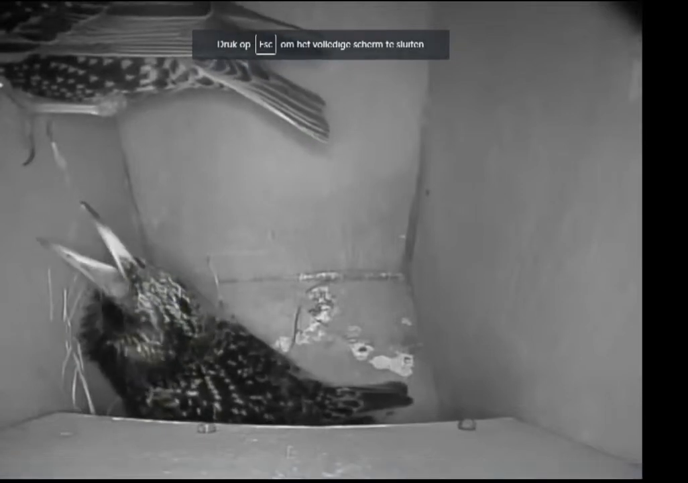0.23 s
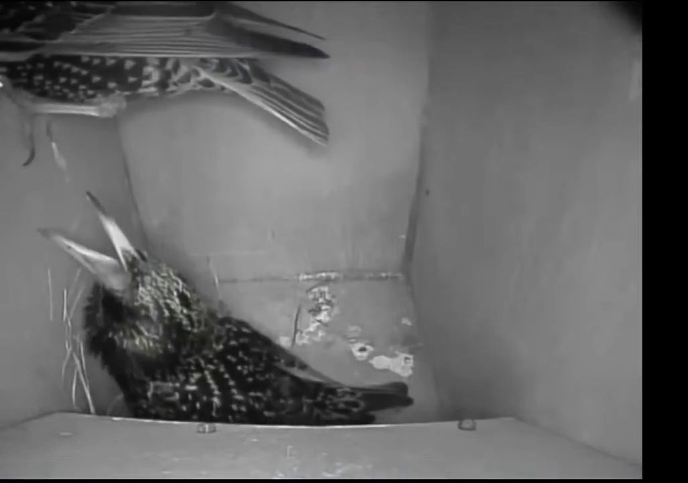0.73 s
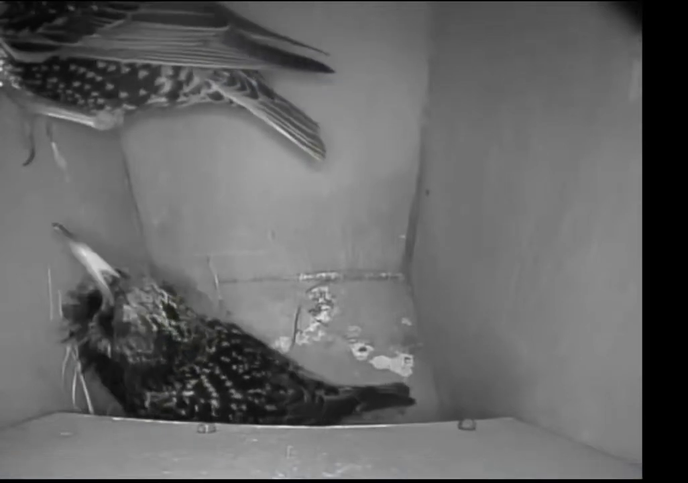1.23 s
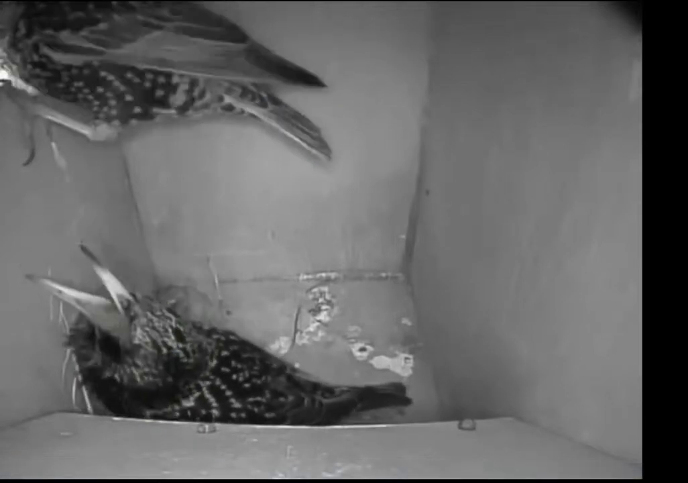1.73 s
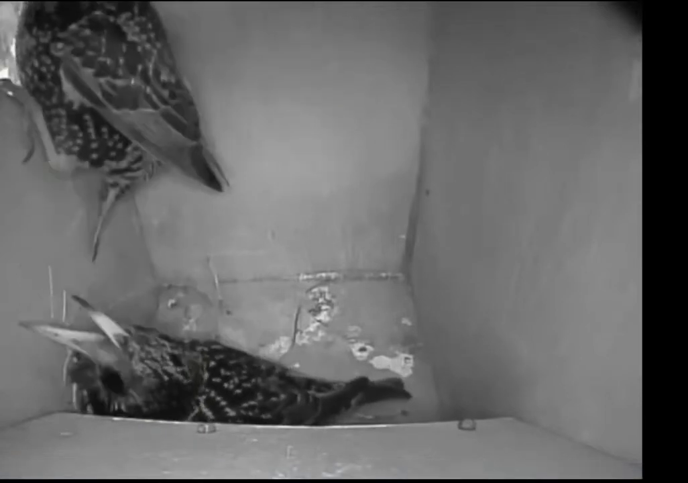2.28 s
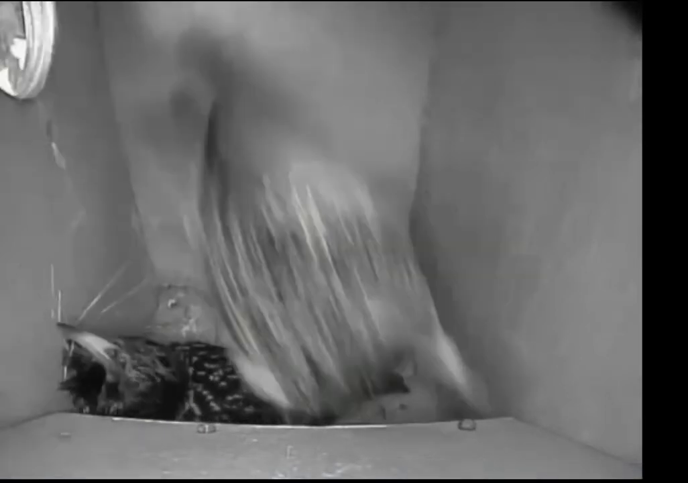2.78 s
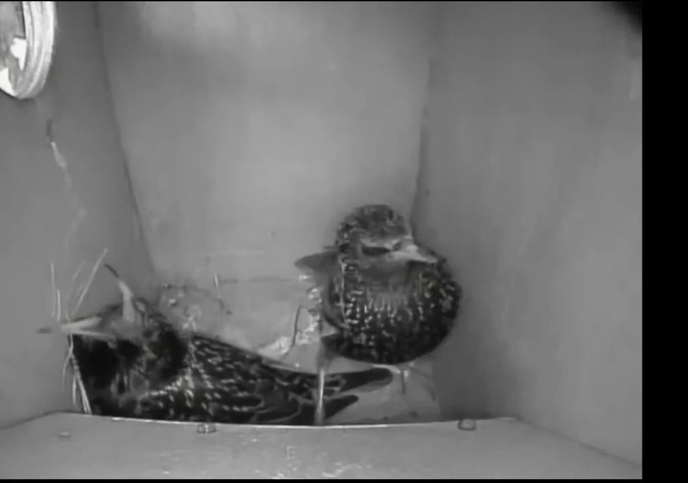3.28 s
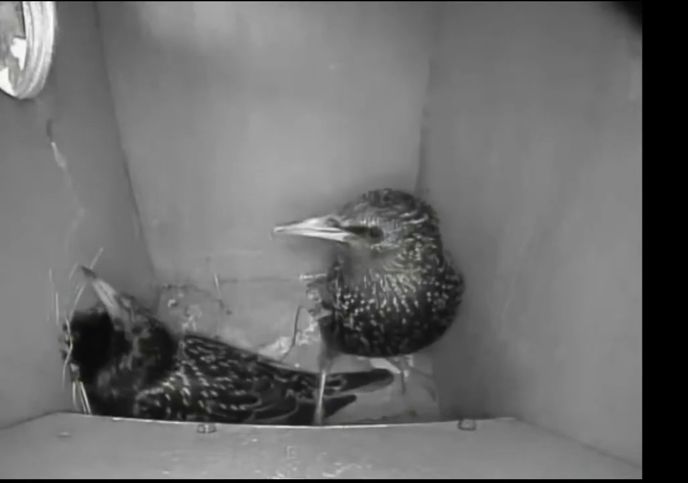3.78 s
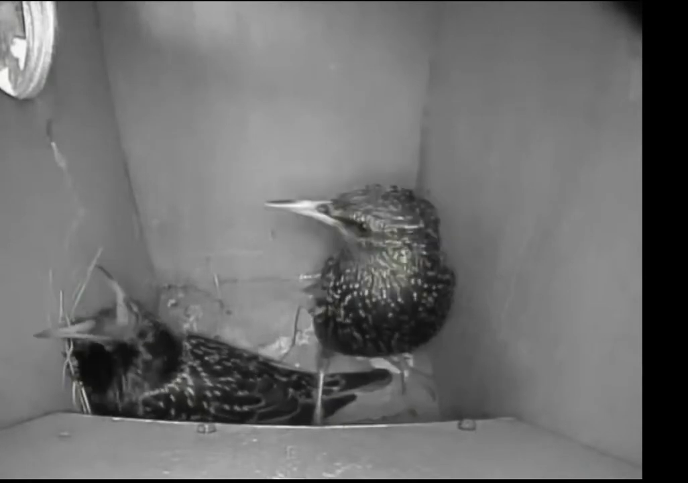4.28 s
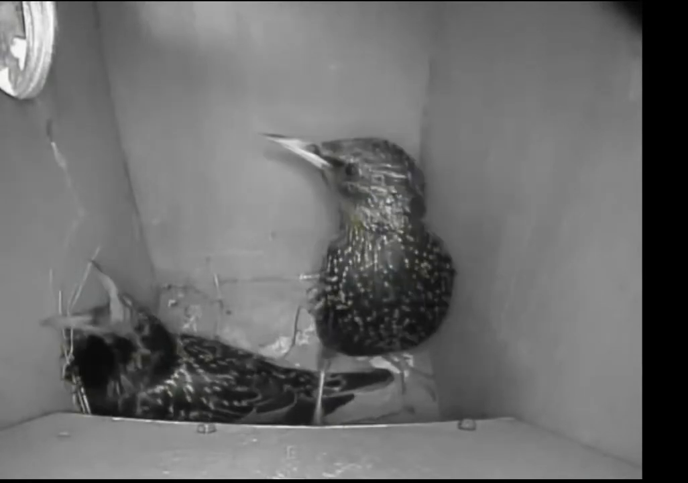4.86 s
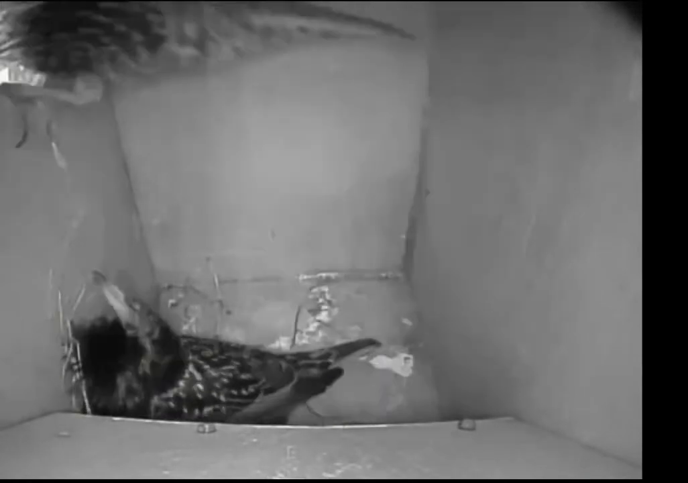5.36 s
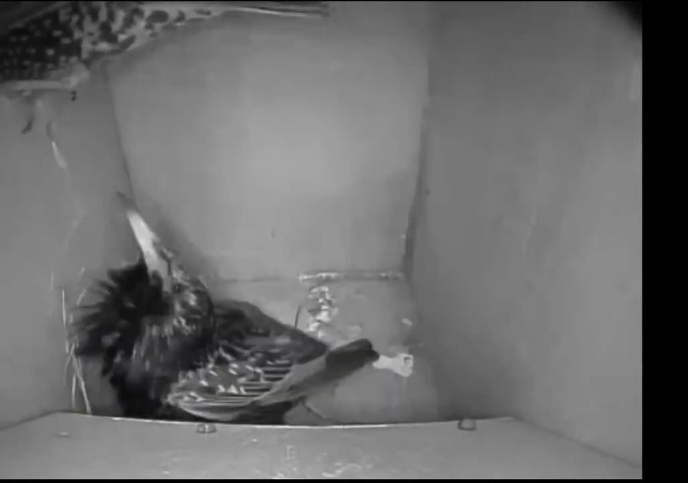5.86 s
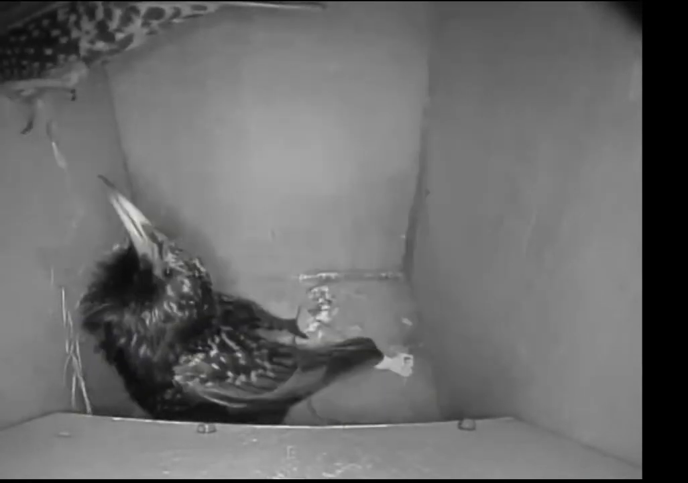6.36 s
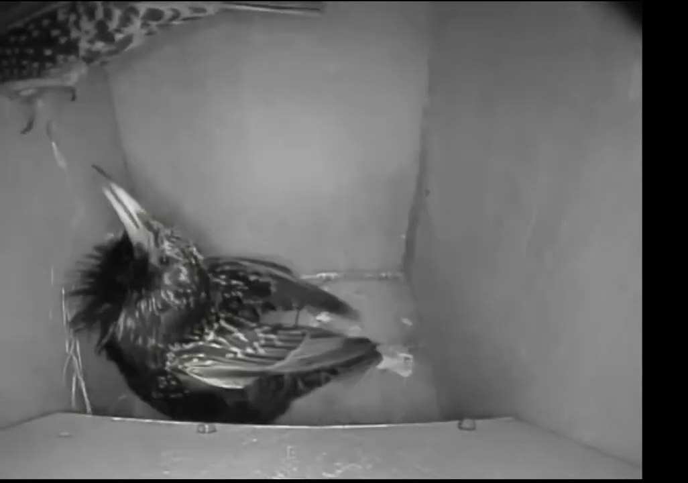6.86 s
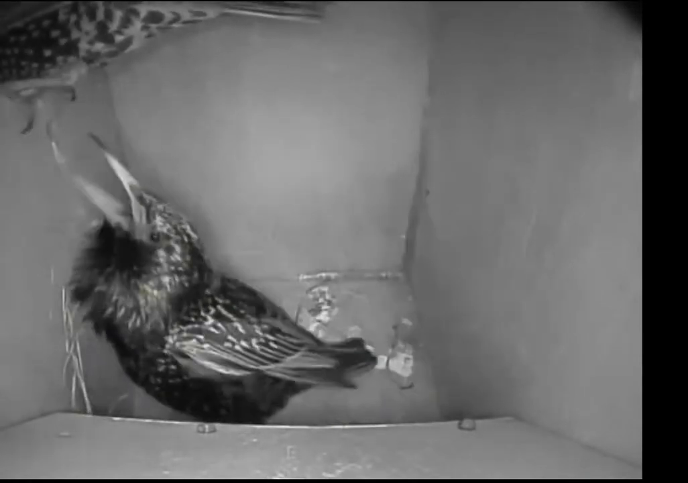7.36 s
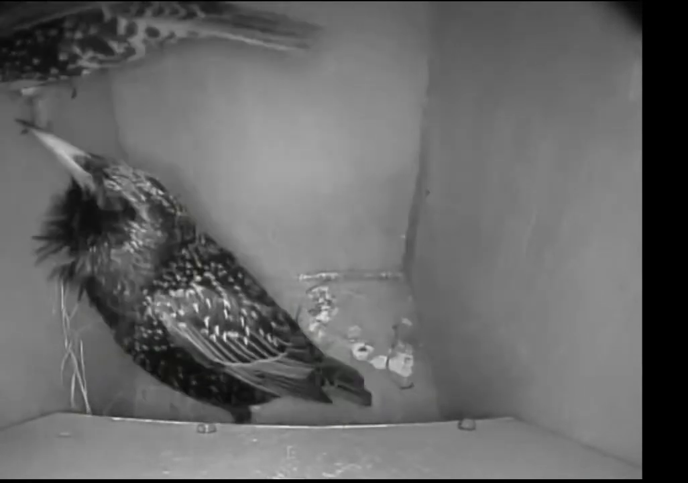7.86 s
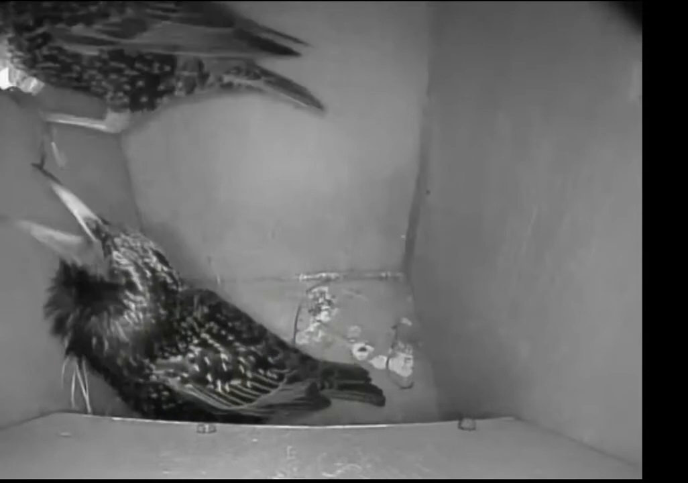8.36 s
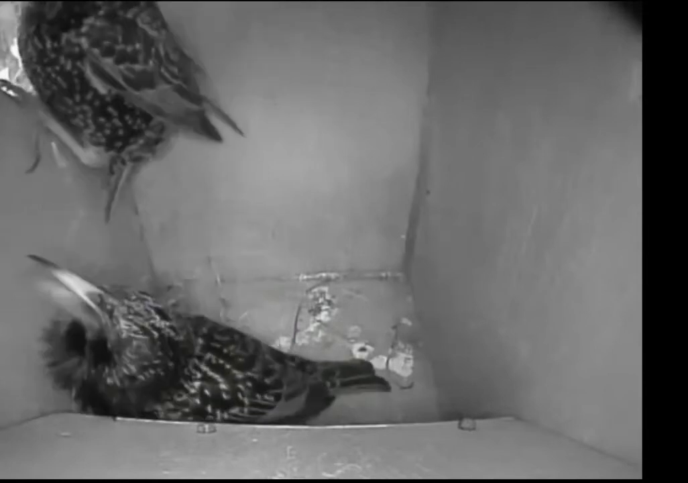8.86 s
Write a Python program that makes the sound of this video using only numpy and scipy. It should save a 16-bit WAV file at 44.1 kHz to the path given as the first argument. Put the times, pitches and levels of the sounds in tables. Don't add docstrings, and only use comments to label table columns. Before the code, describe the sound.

Inside a small wooden nest box, a starling whistles softly, then clicks, screeches and bursts into fast, shrill rattles over low microphone rumble.

```python
import sys
import numpy as np
from scipy import signal
from scipy.fft import rfft, irfft, next_fast_len
from scipy.io import wavfile
from scipy.ndimage import uniform_filter1d

SR = 44100
rng = np.random.default_rng(int(sys.argv[2]) if len(sys.argv) > 2 else 0)


def volts_from_db(level):
    exponent = np.asarray(level, float) / 20
    return 10 ** exponent


def log_audio(samples):
    frames = np.atleast_2d(samples).T
    limited = np.clip(frames, -1, 1)
    pcm = np.round(limited * 32767).astype(np.int16)
    wavfile.write(sys.argv[1], SR, pcm)


N = 402191


def evened(x):
    return x / np.sqrt(np.mean(x ** 2) + 1e-20)


def add(mix, start_s, sound):
    part = mix[round(start_s * SR):][:len(sound)]
    part += sound[:len(part)]


def sine(hz):
    return np.sin(2 * np.pi * np.cumsum(hz) / SR)


def wander(n, rate_hz):
    size = next_fast_len(n)
    f = np.fft.rfftfreq(size, 1 / SR)
    lowpass = (f > 0) / (1 + (f / rate_hz) ** 4)
    return evened(irfft(rfft(rng.standard_normal(size)) * lowpass, size)[:n])


def coloured(points):
    size = next_fast_len(N)
    hz, (f, db) = np.fft.rfftfreq(size, 1 / SR), np.transpose(points)
    gain = volts_from_db(np.interp(np.log(hz + 1), np.log(f), db))
    return evened(irfft(rfft(rng.standard_normal(size)) * gain, size)[:N])


def resonate(x, hz, width_hz):
    turn = np.exp(2j * np.pi * np.cumsum(hz * np.ones(len(x))) / SR)
    r = np.exp(-np.pi * width_hz / SR)
    return 2 * (turn * signal.lfilter([(1 - r) ** 2], [1, -2 * r, r * r], x / turn)).real


def unroll(rows):
    s, *columns = np.transpose(rows)
    t = np.arange(s[0], s[-1], 1 / SR)
    return [np.interp(t, s, c) for c in columns]


def glide(start, end, first_hz, last_hz, db, bulge_hz=0):
    return start, end, first_hz, (first_hz + last_hz) / 2 + bulge_hz, last_hz, db


def note(row, shake_hz, flutter_db, rate_hz, taper, ratios=(1,), orders_db=(0,), bend=1.55):
    start, end, first, middle, last, db = row
    u = np.linspace(-1, 1, max(round((end - start) * SR), 200))
    hz = middle + (last - first) / 2 * u + ((first + last) / 2 - middle) * abs(u) ** bend
    hz = hz + shake_hz * wander(len(u), rate_hz)
    turns = np.cumsum(hz) / SR
    tone = sum(volts_from_db(o) * np.sin(2 * np.pi * k * turns) for k, o in zip(ratios, orders_db))
    level = np.sqrt(2) * volts_from_db(db + flutter_db * wander(len(u), rate_hz))
    return level * tone * signal.windows.tukey(len(u), np.clip(taper, 0, 1))


def whistle(song, row):
    add(song, row[0], note(row, shake_hz=45, flutter_db=3.2, rate_hz=150, taper=.5))


def husk(start, end, hz, db, width_hz, per_s):
    n = round((end - start) * SR)
    air = rng.standard_normal(n) * volts_from_db(2.0 * wander(n, per_s))
    return volts_from_db(db) * evened(resonate(air, hz, width_hz)) * signal.windows.tukey(n, .6)


# (pitch [Hz], density [dB per Hz])
RUMBLE_COLOUR = [(12, -29.5), (20, -22), (28, -16), (35, -25), (41, -9), (54, -18.5), (158, -18.5),
                 (247, -45.5), (522, -54), (2380, -71), (4550, -74.5), (6450, -66.5), (7680, -102.5),
                 (9980, -121), (16900, -120)]


def rumble():
    return volts_from_db(-52 + 0.87 * wander(N, 7.2)) * coloured(RUMBLE_COLOUR)


def patchy(x, patchy_db):
    z = signal.stft(x, nperseg=512)[2]
    patches = uniform_filter1d(rng.standard_normal(z.shape), size=12, axis=0)
    patches = evened(uniform_filter1d(patches, size=7, axis=1))
    return signal.istft(z * volts_from_db(patchy_db * patches), nperseg=512)[1][:N]


# (time [s], level [dB])
RUSTLE = [
    (2.89, -63.5),
    (7.5, -64),
    (9.12, -62),
]
# (pitch [Hz], level [dB])
RUSTLE_COLOUR = [(200, 10.5), (500, -0.5), (1400, -2.5), (3000, -4), (5000, -1.5), (7000, -13)]


def rustle():
    s, db = np.transpose(RUSTLE)
    quiet_db = -72.5
    level_db = np.interp(np.arange(N) / SR, s, db, left=quiet_db) + 2.5 + 1.1 * wander(N, 60)
    return volts_from_db(level_db) * patchy(coloured(RUSTLE_COLOUR), patchy_db=3.5)


# (start [s], end [s], pitch [Hz], level [dB])
BUZZES = [(0.052, 0.174, 5100, -75.5), (0.504, 0.638, 4330, -74), (0.692, 0.795, 4460, -72.5),
          (1.331, 1.485, 4830, -67.5), (2.958, 3.098, 4870, -67.5), (3.19, 3.4, 2400, -60),
          (3.2, 3.4, 3240, -67.5), (3.406, 3.465, 1148, -59), (3.742, 3.79, 2900, -51),
          (3.738, 3.79, 4300, -46), (3.745, 3.79, 5900, -50), (4.109, 4.203, 2600, -62.5),
          (4.029, 4.07, 1810, -65), (4.484, 4.621, 2430, -58), (5.84, 5.911, 2800, -59.5),
          (6.96, 7.01, 2750, -59), (7.596, 7.668, 2704, -57)]


def buzzes(song):
    for start, end, hz, db in BUZZES:
        row = glide(start, end, hz, hz, db)
        add(song, start, note(row, shake_hz=111, flutter_db=4.5, rate_hz=120, taper=0.17))
        add(song, start, husk(start, end + .02, hz, db, width_hz=750, per_s=150))


# (start [s], end [s], pitch [Hz], level [dB])
HAZE = [(1.34, 1.39, 5250, -67), (6.705, 6.745, 3900, -62), (.98, 1.07, 5800, -72), (1.66, 1.76, 5800, -72),
        (2.42, 2.52, 5780, -71), (3.14, 3.22, 5800, -70), (.06, .2, 3800, -74), (.6, .7, 5400, -74),
        (7.09, 7.21, 3500, -60), (5.591, 5.64, 5000, -54), (5.99, 6.04, 4300, -56), (7.0, 7.105, 4320, -44),
        (7.62, 7.803, 4560, -42.5), (8.163, 8.246, 3500, -59), (8.419, 8.639, 4380, -42),
        (5.33, 5.385, 5050, -41), (8.2, 8.3, 6100, -46), (8.91, 8.985, 6200, -48), (7.62, 7.79, 5350, -40),
        (5.255, 5.3, 4050, -52), (5.335, 5.38, 3900, -50), (5.851, 6.007, 4440, -45.5),
        (3.146, 3.186, 2450, -48), (8.841, 8.862, 5300, -51), (8.861, 8.935, 3750, -54),
        (5.0, 5.045, 2300, -60), (4.03, 4.06, 5500, -48), (4.0, 4.2, 6500, -62), (9.016, 9.046, 5400, -53),
        (9.033, 9.12, 4300, -56), (9.04, 9.12, 2000, -60)]


def haze(song):
    for row in HAZE:
        add(song, row[0], husk(*row, width_hz=540, per_s=130))


# (time [s], level [dB], pitch [Hz], spread [s])
THUD = (.39, -39, 70, .035)


def thud():
    s, db, hz, spread_s = THUD
    t = np.arange(N) / SR - s
    return volts_from_db(db) * np.exp(-(t / spread_s) ** 2) * np.sin(2 * np.pi * hz * t)


# (start [s], end [s], first pitch [Hz], level [dB])
FALLS = [(0.826, 0.998, 6280, -57.5), (1.4, 1.685, 6950, -56.5), (2.152, 2.444, 6920, -56.5),
         (2.89, 3.16, 6900, -55.5), (3.619, 3.739, 6850, -57.5)]


def falls(song):
    rest_hz, sag_s = 5600, .14
    for start, end, hz, db in FALLS:
        middle, last = rest_hz + (hz - rest_hz) * np.exp(-(end - start) * np.array([.5, 1]) / sag_s)
        whistle(song, (start, end, hz, middle, last, db))


def chirp(start, end, hz, db, rise):
    t = np.arange(0, end - start, 1 / SR)
    u = t / t[-1]
    pitch = hz * (1 + rise * (np.sin(np.pi * np.minimum(u, .8) * .8) - .8)) + 20 * wander(len(t), 40)
    warble_hz = 110 + 40 * wander(len(t), 25)
    pitch = pitch + warble_hz * sine(270 + 20 * wander(len(t), 20))
    attack = np.minimum(u / 0.32, 1)
    decay = volts_from_db(-38 * np.maximum(u - .45, 0) + 2.8 * wander(len(t), 45))
    return volts_from_db(db + 3.0) * attack * decay * sine(pitch) * signal.windows.tukey(len(t), .1)


# (start [s], end [s], level [dB])
CHIRPS = [(1.053, 1.238, -53), (1.233, 1.425, -54), (1.749, 1.941, -54.5), (1.973, 2.172, -55),
          (2.492, 2.662, -51), (2.708, 2.899, -54), (3.232, 3.392, -50.5), (3.441, 3.618, -52.5)]


def chirps(song):
    pair_hz, pair_rise = (4240, 4170), (.035, .08)
    for k, (start, end, db) in enumerate(CHIRPS):
        hz = pair_hz[k % 2]
        add(song, start, chirp(start, end, hz, db, pair_rise[k % 2]))
        add(song, start, husk(start, end, hz, db - 15, width_hz=480, per_s=60))


# (start [s], end [s], first pitch [Hz], last pitch [Hz], level [dB])
GLIDES = [(4.836, 4.855, 3500, 4180, -53), (4.851, 4.884, 4200, 3400, -49), (4.825, 4.846, 4950, 5600, -60),
          (4.842, 4.882, 5600, 5200, -57), (5.125, 5.175, 5150, 5320, -58), (5.165, 5.215, 5320, 5100, -56),
          (5.205, 5.27, 5250, 4950, -50), (2.897, 3.002, 2650, 2740, -65), (3.461, 3.514, 1450, 1350, -59),
          (3.669, 3.704, 3060, 2740, -53.5), (3.918, 3.944, 5420, 6270, -52.5),
          (6.055, 6.084, 2740, 3740, -52.5), (6.076, 6.109, 3720, 2600, -54),
          (4.29, 4.316, 4080, 3580, -55), (4.32, 4.36, 3100, 2750, -54.5), (4.32, 4.389, 2750, 2520, -60),
          (6.008, 6.037, 4180, 3500, -47.5), (6.134, 6.202, 5400, 5200, -62.5),
          (6.323, 6.361, 3550, 4440, -44), (8.418, 8.465, 2900, 2620, -51),
          (8.469, 8.54, 2850, 3090, -53.5), (8.552, 8.68, 1410, 1379, -62), (8.71, 8.775, 1390, 1600, -63),
          (8.933, 8.965, 4760, 5560, -58), (8.948, 8.976, 3020, 3100, -59)]


def glides(song):
    for row in GLIDES:
        whistle(song, glide(*row))


def click(db, hz, wood=0.097):
    t = np.arange(800) / SR
    ring = np.sin(2 * np.pi * hz * t) * np.exp(-t / .0012)
    crack = .38 * rng.standard_normal(len(t)) * np.exp(-t / .002)
    knock = wood * np.sin(2 * np.pi * 1400 * t) * np.exp(-t / 0.014)
    return volts_from_db(db + 2) * (ring + crack + knock)


# (time [s], peak [dB])
CLICKS = [(2.904, -56), (2.9135, -47), (2.9445, -37.5), (3.0002, -38), (3.3483, -40.5), (3.5277, -38),
          (3.5748, -42), (3.6035, -42.5), (3.6506, -41.5), (3.726, -43), (3.8242, -38), (3.908, -46),
          (4.225, -44.5), (4.289, -41.5), (4.395, -40), (4.6834, -39.5), (4.8231, -37.5), (5.11, -43),
          (5.975, -48), (6.2375, -42), (6.761, -42.5), (7.2716, -47), (7.396, -43.5), (8.04, -49),
          (8.079, -45.5), (8.7344, -52), (8.921, -46)]


def tongue_clicks(song):
    for s, db in CLICKS:
        add(song, s, click(db, 2620))


# (start [s], end [s], first pitch [Hz], last pitch [Hz], level [dB])
SQUAWKS = [(4.005, 4.04, 4420, 4520, -41), (4.055, 4.1, 3500, 2850, -44), (3.995, 4.04, 2500, 3300, -51),
           (4.035, 4.062, 3550, 3700, -42), (4.03, 4.055, 5600, 5450, -47), (8.055, 8.09, 4700, 5500, -58),
           (3.405, 3.44, 1950, 1050, -53), (3.135, 3.19, 2800, 2250, -55), (8.555, 8.635, 1800, 2550, -58),
           (4.2, 4.25, 4450, 4050, -62), (3.6, 3.7, 4200, 3600, -65), (8.74, 8.78, 5020, 5520, -61)]


def squawks(song):
    for row in SQUAWKS:
        add(song, row[0], note(glide(*row), shake_hz=108, flutter_db=5.0, rate_hz=410, taper=0.35))


# (start [s], end [s], pitch [Hz], level [dB])
RASPS = [(3.15, 3.4, 2550, -58), (6.092, 6.152, 2090, -63.5), (6.62, 6.656, 2100, -61),
         (7.126, 7.188, 2120, -62), (7.26, 7.278, 2000, -61), (7.84, 7.947, 2010, -54),
         (8.552, 8.64, 2270, -57), (8.744, 8.84, 1932, -66.5)]


def rasps(song):
    for start, end, hz, db in RASPS:
        add(song, start, husk(start - .02, end + 0.0057, hz, db + 0.5, width_hz=1000, per_s=130))


# (time [s], peak [dB])
TICKS = [(3.4151, -45), (3.575, -52), (3.651, -50), (4.3944, -42), (4.5422, -31.5), (4.65, -35),
         (5.156, -39), (5.46, -36), (5.689, -41), (6.128, -35), (6.19, -42)]


def beak_ticks(song):
    for s, db in TICKS:
        add(song, s, click(db - 1.5, 5760, wood=0))


# (start [s], end [s], pitch [Hz], level [dB])
PIPES = [(3.43, 3.503, 6070, -66), (3.454, 3.526, 2624, -58), (3.793, 3.873, 5860, -58.5),
         (3.824, 3.915, 808, -60.5), (3.83, 3.902, 1390, -66.5), (3.818, 3.93, 6220, -66),
         (3.938, 3.962, 6350, -55), (3.972, 3.988, 6300, -57), (7.215, 7.39, 5150, -66),
         (4.262, 4.362, 5980, -56), (4.4, 4.48, 5800, -65), (4.422, 4.45, 4830, -64),
         (4.669, 4.737, 5820, -58.5), (4.74, 4.814, 6100, -69.5), (4.753, 4.827, 2645, -58),
         (4.982, 5.044, 5520, -68), (4.998, 5.108, 806, -62.5), (5.011, 5.127, 6270, -66.5),
         (5.015, 5.085, 1385, -66), (5.616, 5.78, 5020, -43.5), (6.013, 6.117, 5390, -54.5),
         (6.186, 6.299, 4980, -44.5), (6.61, 6.658, 5060, -69), (6.765, 6.88, 5140, -63),
         (6.849, 6.99, 5040, -44), (7.373, 7.47, 4950, -45.5), (8.162, 8.263, 5030, -50.5),
         (8.869, 8.897, 2610, -64)]


def pipes(song):
    for start, end, hz, db in PIPES:
        row = glide(start, end, hz, hz, db, hz / 80)
        add(song, start, note(row, shake_hz=hz / 170, flutter_db=2.2, rate_hz=60, taper=.5))


def effort(start, peak, end, db, fall_db):
    onset_db = 21
    return [(start, db - onset_db), ((start + peak) / 2, db - 0.31 * onset_db), (peak, db),
            ((peak + end) / 2, db - 0.34 * fall_db), (end, db - fall_db)]


# (pitch [Hz], width [Hz], level [dB])
CHEST = [(1820, 840, -2), (2800, 1340, 3)]
THROAT = [(3550, 310, -6.5), (4400, 560, 3.5), (4990, 180, 0)]
BEAK = [(5594, 1220, 4.3), (6680, 290, 1)]


def screech(rows, chest_db, beak_db):
    effort_db, = unroll(rows)
    parts = []
    for tract in (CHEST, THROAT, BEAK):
        air = rng.standard_normal(len(effort_db)) * volts_from_db(2.8 * wander(len(effort_db), 90))
        part = 0
        for hz, width_hz, db in tract:
            once = resonate(air, hz, 1.8 * width_hz)
            part = part + volts_from_db(db) * resonate(once, hz, 1.8 * width_hz)
        parts.append(evened(part))
    mix = volts_from_db(chest_db) * parts[0] + parts[1] + volts_from_db(beak_db) * parts[2]
    return volts_from_db(effort_db) * mix * signal.windows.tukey(len(mix), .04)


# (start [s], peak [s], end [s], peak effort [dB], fall to the end [dB])
FULL_SCREECHES = [(3.735, 3.765, 3.793, -40, 13), (3.995, 4.025, 4.125, -43, 20),
                  (4.375, 4.4, 4.405, -41.5, 18), (4.44, 4.52, 4.69, -57.5, 8.5),
                  (4.9, 4.952, 5.005, -37.5, 31), (5.445, 5.482, 5.53, -35, 19), (5.55, 5.58, 5.6, -58, 5)]
BRIGHT_SCREECHES = [(4.879, 4.886, 4.925, -31.5, 9.3), (5.82, 5.855, 6.0, -38, 22),
                    (6.947, 6.953, 7.09, -31, 35), (7.5, 7.62, 7.84, -40, 11),
                    (8.32, 8.41, 8.64, -41.5, 20)]
NARROW_SCREECHES = [(5.315, 5.324, 5.338, -29, 5), (5.32, 5.35, 5.39, -35, 7),
                    (5.395, 5.42, 5.432, -35.5, 1.8), (6.405, 6.435, 6.47, -36.5, 2.6),
                    (6.45, 6.48, 6.6, -38, 26)]


def screeches(song):
    for table, chest_db, beak_db in ((FULL_SCREECHES, -7, -1.5), (BRIGHT_SCREECHES, -15, -1),
                                     (NARROW_SCREECHES, -20, -14.5)):
        for row in table:
            add(song, row[0], screech(effort(*row), chest_db, beak_db))


def rattle(rows, per_s, sweep_hz, duty, echo_db, breath_db, twin_hz=253, twin_late=.42, snap=1.0):
    db, hz = unroll(rows)
    n = len(db)
    beat = np.cumsum(per_s * (1 + .008 * wander(n, 30))) / SR
    air = resonate(resonate(rng.standard_normal(n), hz, 1200), hz, 1200)
    out = volts_from_db(breath_db) * evened(air)
    for late, lift_hz, pip_db in ((0, 0, 0), (twin_late, twin_hz, echo_db)):
        u = ((beat - late) % 1 - .5) / duty
        pitch = hz + lift_hz + sweep_hz * np.clip(u, -1, 1) + 70 * wander(n, 60)
        level = volts_from_db(pip_db + 1.2 * wander(n, 50))
        shape = np.exp(-4 * (u * np.where(u < 0, snap, 1 / snap)) ** 2)
        out = out + level * shape * sine(pitch) * 3
    swell_in = np.minimum(beat / 2.2, 1)
    close = np.minimum((beat[-1] - beat) / .3, 1)
    return volts_from_db(db) * evened(out) * swell_in * close


# (start [s], end [s], pitch [Hz], level [dB], pips [1/s])
TRILL = (4.068, 4.192, 3330, -49, 64)


def trill(song):
    start, end, hz, db, per_s = TRILL
    rows = [(start, db, hz), (end, db - 5, hz)]
    add(song, start, rattle(rows, per_s, sweep_hz=60, duty=.5, echo_db=-18, breath_db=-16))


# (start [s], end [s], top pitch [Hz], level [dB])
ARCHES = [(5.157, 5.257, 4460, -47), (5.606, 5.73, 4500, -46), (6.167, 6.292, 4520, -46.5),
          (6.843, 6.957, 4560, -43.5), (7.329, 7.372, 2620, -66.5), (7.352, 7.476, 4540, -46),
          (7.43, 7.528, 4170, -46), (7.449, 7.504, 4850, -50), (7.967, 8.012, 2980, -62),
          (8.074, 8.173, 3960, -45), (8.088, 8.152, 4585, -42), (8.159, 8.283, 4540, -46),
          (8.26, 8.294, 3080, -59), (8.766, 8.873, 4100, -44.5), (8.783, 8.851, 4590, -41),
          (8.945, 9.05, 4230, -46), (8.962, 9.03, 4750, -46.5), (8.485, 8.535, 6250, -45.5)]


def arches(song):
    for start, end, hz, db in ARCHES:
        foot_hz = hz * (1 - 8.6 * (end - start) ** 1.5)
        whistle(song, (start, end, foot_hz, hz, 1.01 * foot_hz, db - 1.0))


def swell(start, peak, end, db, hz, rise_db_per_s, fall_db_per_s):
    first_db = db - rise_db_per_s * (peak - start)
    last_db = db - fall_db_per_s * (end - peak)
    return [(start, first_db, hz), (peak, db, hz), (end, last_db, hz)]


def held(rows):
    db, _ = unroll(rows)
    hz = 5030 + 60 * wander(len(db), 73)
    level = volts_from_db(db - 4 + 3 * wander(len(db), 90))
    return level * sine(hz) * signal.windows.tukey(len(db), .1)


# (start [s], peak [s], end [s], peak [dB], pips [1/s])
MID_RATTLE = [(5.246, 5.283, 5.3, -37, 73), (5.7155, 5.831, 5.841, -28, 76), (5.8426, 5.893, 5.98, -34, 84),
              (6.2625, 6.416, 6.411, -26, 78), (6.951, 6.985, 7.07, -33.5, 76),
              (7.448, 7.6, 7.66, -27, 77.1), (8.2417, 8.406, 8.42, -28, 76.3),
              (8.403, 8.469, 8.6, -31.5, 81)]


def mid_rattles(song):
    for *row, per_s in MID_RATTLE:
        rows = swell(*row, hz=5447, rise_db_per_s=108.5, fall_db_per_s=130)
        add(song, row[0], rattle(rows, per_s, sweep_hz=450, duty=.24, echo_db=-15, breath_db=-19))
        add(song, row[0], held(rows))


# (start [s], end [s], first pitch [Hz], last pitch [Hz], level [dB])
SQUEAKS = [(5.298, 5.328, 4250, 4350, -27), (5.385, 5.414, 4000, 3750, -32), (6.42, 6.452, 4000, 3720, -33),
           (7.797, 7.835, 4150, 4050, -47)]
# (overtone numbers, number at the listed pitch, levels [dB])
SQUEAK_ORDERS = [([1, 2, 3, 4, 5, 6], 4, [-36, -38, -18, 0, -28, -25]), ([5, 7, 10, 12],
                 7, [-18, 0, -24, -26]), ([5, 7, 10], 7, [-17, 0, -25]), ([1, 2, 3, 4, 5],
                 3, [-28, -4, 0, 7, -12])]


def squeaks(song):
    for row, (overtones, listed, orders_db) in zip(SQUEAKS, SQUEAK_ORDERS):
        ratios = np.divide(overtones, listed)
        add(song, row[0], note(glide(*row, bulge_hz=250), shake_hz=28, flutter_db=0.61, rate_hz=64,
                               taper=0.23, ratios=ratios, orders_db=orders_db))


# (start [s], peak [s], end [s], peak [dB])
LOW_RATTLE = [(5.769, 5.825, 5.841, -25), (6.3276, 6.375, 6.411, -26), (7.514, 7.563, 7.635, -26.5),
              (8.3228, 8.395, 8.415, -26.5)]


def low_rattles(song):
    for row in LOW_RATTLE:
        rows = swell(*row, hz=4457, rise_db_per_s=178, fall_db_per_s=159)
        add(song, row[0], rattle(rows, per_s=71, sweep_hz=450, duty=.36, echo_db=-20, breath_db=-17))


# (start [s], end [s], level [dB])
RISES = [(6.015, 6.093, -62.5), (6.557, 6.632, -62), (7.058, 7.14, -63), (7.184, 7.264, -62.5)]


def rises(song):
    from_hz, hz_per_s = 1340, 8000
    for start, end, db in RISES:
        row = glide(start, end, from_hz, from_hz + hz_per_s * (end - start), db - 1.5, -120)
        add(song, start, note(row, shake_hz=60, flutter_db=4.5, rate_hz=200, taper=.6))


def climb(start, turn, release, end, db):
    from_hz, top_hz, sink_hz_per_s, sunk_hz = 6050, 6400, 6500, 5880
    growth_db, rise_db_per_s, fall_db_per_s = 2, 229, 268.5
    release_hz, end_hz = [max(top_hz - sink_hz_per_s * (s - turn), sunk_hz) for s in (release, end)]
    turn_db = db - growth_db
    return [(start, turn_db - rise_db_per_s * (turn - start), from_hz), (turn, turn_db, top_hz),
            (release, db, release_hz), (end, db - fall_db_per_s * (end - release), end_hz)]


# (start [s], turn [s], release [s], end [s], level [dB])
HIGH_RATTLE = [(7.5955, 7.675, 7.735, 7.795, -22.5), (8.1537, 8.332, 8.445, 8.62, -22.5),
               (8.847, 9.045, 9.1, 9.12, -23.5)]


def high_rattles(song):
    for row, per_s in zip(HIGH_RATTLE, (88.7, 90, 90.5)):
        add(song, row[0], rattle(climb(*row), per_s, sweep_hz=380, duty=.23, echo_db=-6.5,
                                 breath_db=-16, twin_hz=420, twin_late=.38, snap=1.4))


CUTS = [3.7903, 4.4004, 5.4306]


def box(x):
    t = np.arange(12000) / SR
    echoes = rng.standard_normal(len(t)) * (rng.random(len(t)) < .08)
    tail = echoes * (volts_from_db(-60 * t / .07) + volts_from_db(-10.5 - 60 * t / .35))
    tail = tail / np.linalg.norm(tail)
    parts = np.split(x, np.round(np.multiply(CUTS, SR)).astype(int))
    return np.concatenate([signal.oaconvolve(p, tail)[:len(p)] for p in parts])


def scene():
    song = np.zeros(N)
    for source in (buzzes, haze, falls, chirps, glides, tongue_clicks, squawks, rasps, beak_ticks, pipes,
                   screeches, trill, arches, mid_rattles, squeaks, low_rattles, rises, high_rattles):
        source(song)
    walls = volts_from_db(-10) * box(song)
    return (song + walls + rustle() + rumble() + thud())[None]


# (time [s], peak [dB])
FAINT_SKIPS = [(0.0494, -79), (0.2694, -75), (0.6195, -73), (0.8394, -72), (1.2394, -78), (2.4104, -69)]
SKIPS = [(3.0305, -68), (3.1602, -58), (3.7903, -60), (4.2602, -69), (4.4004, -47), (4.5206, -57),
         (4.8803, -46), (5.1502, -56), (5.4306, -48), (5.8406, -56), (5.9404, -58), (6.1305, -60),
         (6.4103, -27), (6.6004, -64), (6.9506, -52), (7.0005, -37), (7.0504, -66), (8.7106, -56),
         (8.9805, -48), (9.1185, -40)]


def skips(out):
    for table, lift_db in ((FAINT_SKIPS, 18.5), (SKIPS, 12)):
        for s, db in table:
            add(out, s, volts_from_db(db + lift_db) * np.array([1, .5]))


def roll_off(x):
    return signal.sosfilt(signal.butter(12, 15800, fs=SR, output="sos"), x)


def record(dry):
    buzz_band = signal.butter(3, [70, 850], "bandpass", fs=SR, output="sos")
    beat = signal.sosfilt(buzz_band, abs(dry) ** 1.65)
    band_limit = signal.firwin(101, 7500, window=("kaiser", 8), fs=SR)[None]
    out = signal.oaconvolve(dry - 1.55 * beat, band_limit, "same")
    overtone_band = signal.butter(2, [7600, 11500], "bandpass", fs=SR, output="sos")
    out += 0.006 * signal.sosfilt(overtone_band, out ** 2)
    skips(out[0])
    return roll_off(out + .0205)


dry = scene()
out = record(dry)
log_audio(out)
```